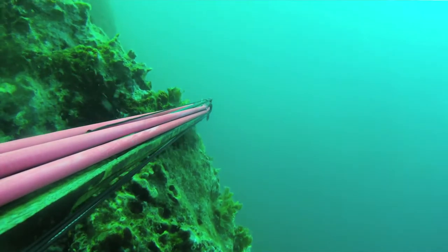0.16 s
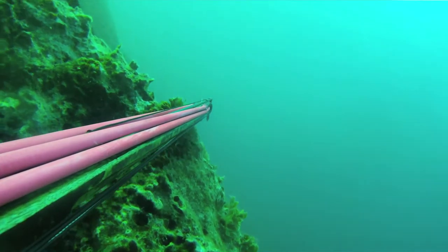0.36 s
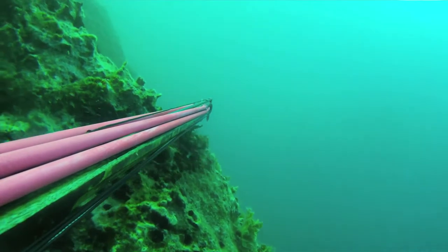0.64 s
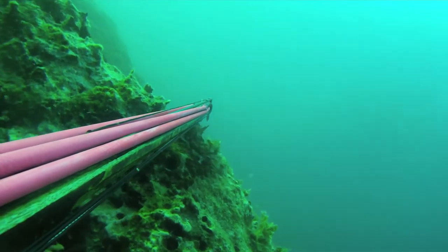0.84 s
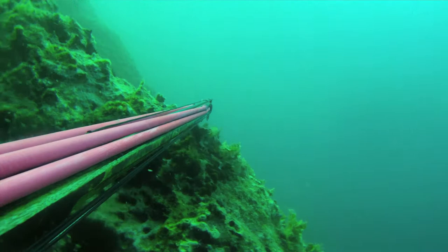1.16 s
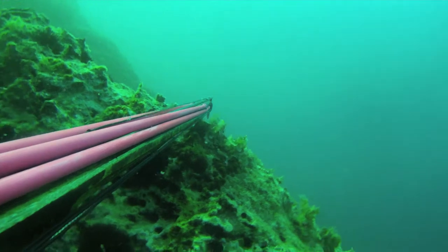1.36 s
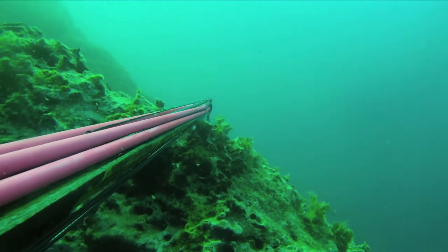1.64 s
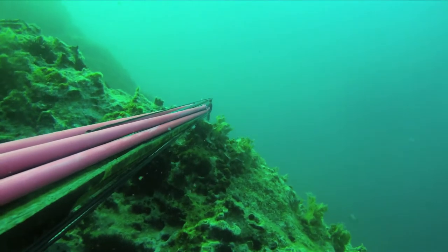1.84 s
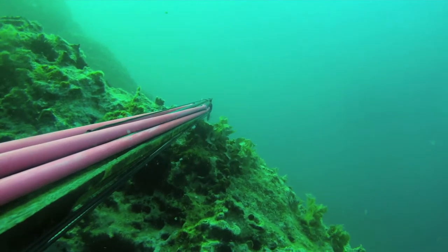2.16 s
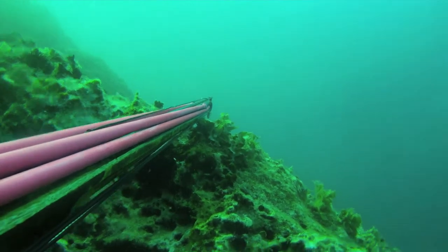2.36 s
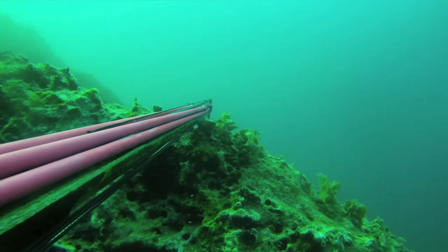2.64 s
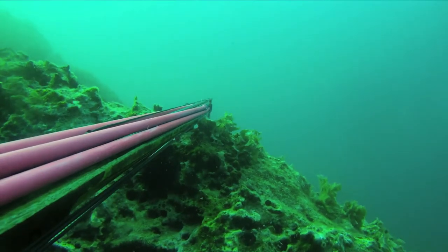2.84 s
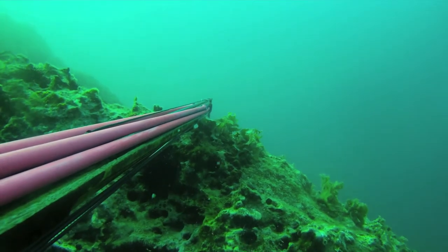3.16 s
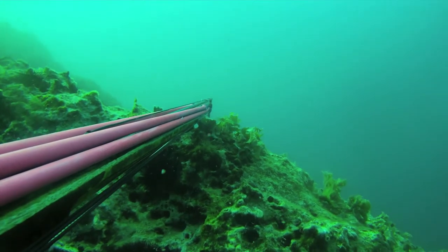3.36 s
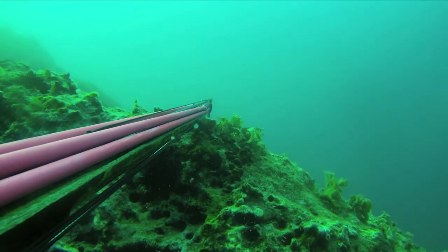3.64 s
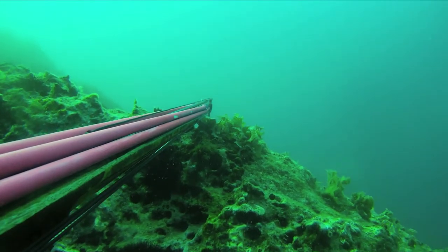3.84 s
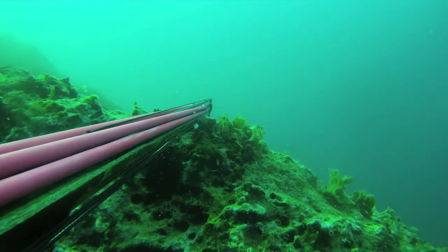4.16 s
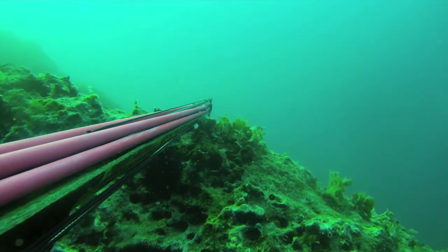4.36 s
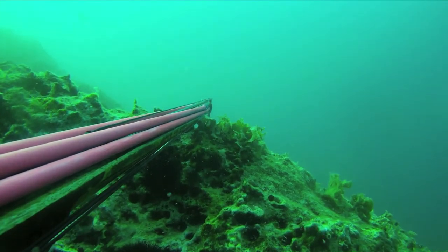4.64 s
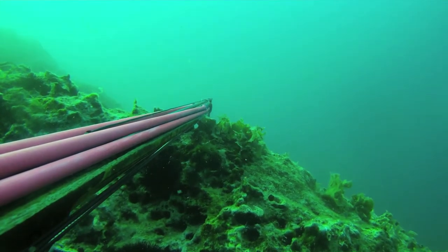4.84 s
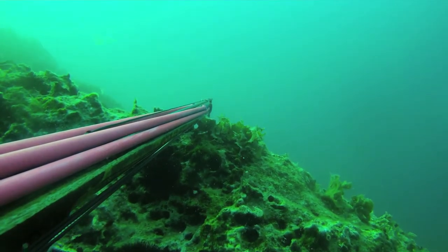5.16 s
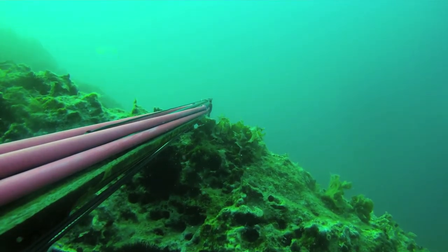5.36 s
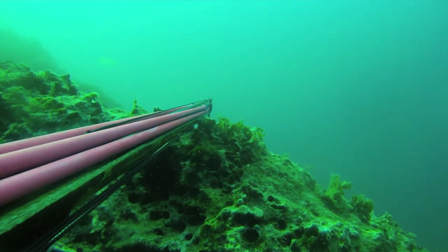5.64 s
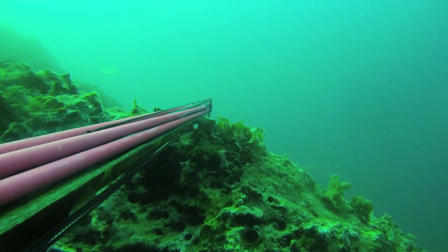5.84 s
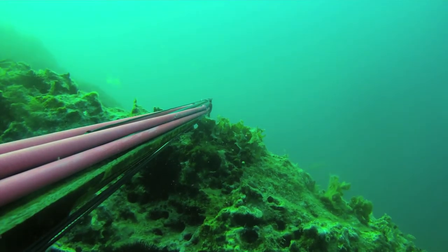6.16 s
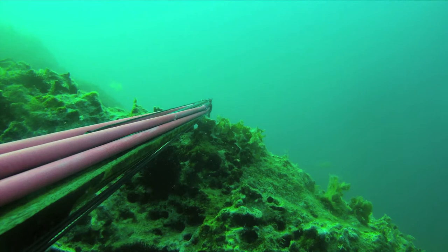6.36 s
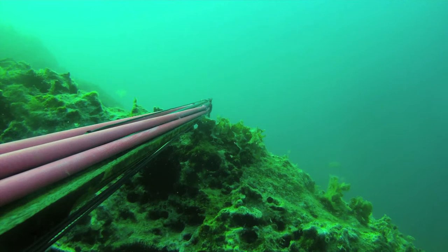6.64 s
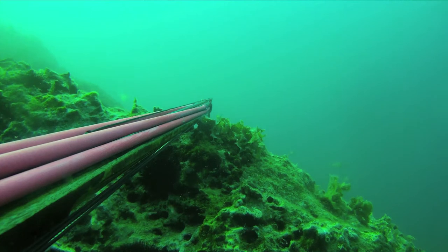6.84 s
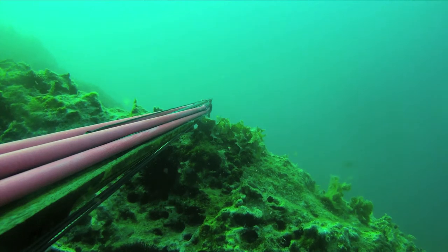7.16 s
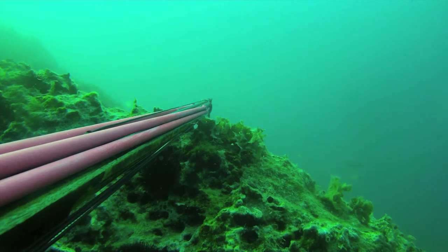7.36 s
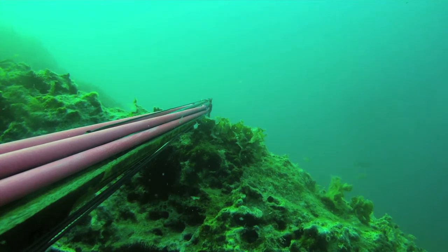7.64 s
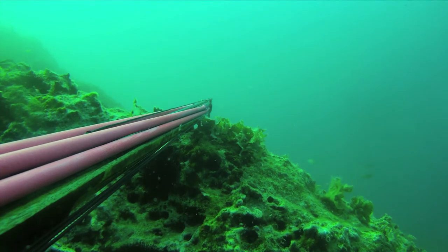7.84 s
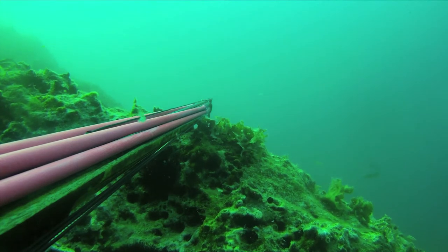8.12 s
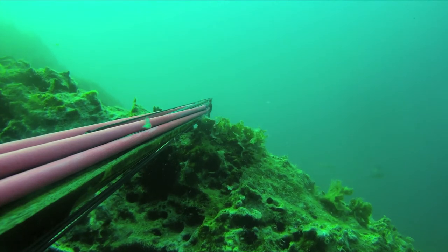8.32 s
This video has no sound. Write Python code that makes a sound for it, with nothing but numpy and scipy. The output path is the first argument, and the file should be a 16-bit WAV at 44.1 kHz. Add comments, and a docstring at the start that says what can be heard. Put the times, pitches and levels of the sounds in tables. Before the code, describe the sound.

Dense frying crackle of shrimp fills the water from start to end, near snaps standing out at irregular moments. Two dull knocks come within the first second, followed by a short burst of low gear thumps, rubbing and a tiny rubber squeak. After a calm stretch, three muffled knocks sound, then three more. Heard through a sealed underwater housing, with brittle, metallic highs.

```python
"""Shrimp crackle all round from the first moment, over a low wash: a rocky reef heard under water.
Each snap is one pulse with echoes off the rock, coloured by the sealed housing round the microphone.
Dull knocks rebound within milliseconds, first as a pair, then in two runs of three. Early on a diver's
speargun rumbles and rubs, bumps the housing and rings low, and rubber squeaks once.
The recorder holds each sample, which mirrors the sound into the treble."""
import sys
import numpy as np
from scipy import signal
from scipy.fft import rfft, irfft
from scipy.io import wavfile
from scipy.ndimage import uniform_filter1d

SR = 44100
rng = np.random.default_rng(int(sys.argv[2]) if len(sys.argv) > 2 else 0)


def generate_wav(signal):
    """Clip the signal to [-1, 1] and save it as 16-bit WAV at the path in sys.argv[1]."""
    frames = np.transpose(np.atleast_2d(signal))
    scaled = np.clip(frames, -1, 1) * 32767
    pcm = np.round(scaled).astype(np.int16)
    wavfile.write(sys.argv[1], SR, pcm)


N = 374409  # length in samples

HOLD_HZ, EDGE_HZ = 12000, 15450  # rate of the held samples, upper band limit
CREVICE_LOW_HZ, CREVICE_HIGH_HZ = 1750, 5150  # range in which the shrimps' crevices ring


def gain_of(db):
    """Decibels to amplitude."""
    return 10 ** (np.asarray(db) / 20)


def evened(x, size=None):
    """Scales x so that its first samples (or all) have an rms of 1."""
    return x / np.sqrt(np.mean(x[:size] ** 2) + 1e-20)


def read(points, hz):
    """Reads a spectrum on a log-frequency axis."""
    f, value = np.transpose(points)
    return np.interp(np.log(hz + 1), np.log(f + 1), value)


def add(mix, s, sound):
    """Mixes a sound in at time s."""
    part = mix[max(round(s * SR), 0):][:len(sound)]
    part += sound[:len(part)]


def ring(colour, tilt_db, from_hz, size=4096):
    """Minimum-phase impulse response of a spectrum, tilted in dB an octave from a corner to half the hold rate."""
    hz = abs(np.fft.fftfreq(size, 1 / SR))
    octaves = np.log2(np.clip(hz, from_hz, HOLD_HZ / 2))
    log_gain = np.log(gain_of(read(colour, hz) + tilt_db * octaves))
    # the Hilbert transform of the log gain gives the phase
    spectrum = np.exp(np.conj(signal.hilbert(log_gain)))
    return np.fft.ifft(spectrum).real[:size // 2]


def noise(colour):
    """Steady noise of a given spectrum, with an rms of 1."""
    gain = gain_of(read(colour, np.fft.rfftfreq(N, 1 / SR)))
    return evened(irfft(rfft(rng.standard_normal(N)) * gain, N))


def scatter(t60, per_s, size=6000):
    """A dying train of sparse random echoes with energy 1."""
    t = np.arange(size) / SR
    hits = rng.random(size) < per_s / SR
    taps = rng.standard_normal(size) * hits * gain_of(-60 * t / t60)
    return taps / (np.linalg.norm(taps) + 1e-12)


def disperse(x, hz, width_hz):
    """An all-pass resonance: the band round hz arrives late, as bending waves do in a thin wall."""
    r = np.exp(-np.pi * width_hz / SR)
    poles = np.array([1, -2 * r * np.cos(2 * np.pi * hz / SR), r * r])
    return signal.lfilter(poles[::-1], poles, x)


# The housing's answer to a snap. Each row: frequency in Hz, relative level in dB.
HOUSING_COLOUR = [(60, -42), (500, -23.5), (1100, -24.5), (1450, -13.5), (1600, -13), (1780, -2), (2150, 2),
                  (2550, 0), (2930, -9.5), (3150, -2), (3450, -9), (3850, -7.5), (4330, -13.5), (4700, -8),
                  (5350, -8.5), (5900, -17.5)]


def snap(tilt_db, crevice_hz, rock_t60, crevice_db=4, crevice_q=5, even_t60=0.028, reef_db=-11, reef_t60=0.093):
    """A collapsing bubble: one pulse, quick echoes off the rock round it, a thin tail from the reef."""
    # the deeper in a crevice, the more it is heard by its echoes
    echo_gain = np.sqrt(rock_t60 / even_t60)
    paths = echo_gain * scatter(rock_t60, per_s=9000)
    paths += gain_of(reef_db) * scatter(reef_t60, per_s=1500)
    paths[0] += 1  # the direct pulse
    crevice = signal.iirpeak(crevice_hz, crevice_q, fs=SR)
    paths += gain_of(crevice_db) * signal.lfilter(*crevice, paths)
    housing = ring(HOUSING_COLOUR, tilt_db, from_hz=1860)
    return evened(signal.fftconvolve(paths, housing), size=175)


def colony(per_s, spread_db, limit_db, tilt_db, tilt_spread_db, t60, count=32):
    """Many shrimp at random moments; each patch of reef has its own echoes and colour, and few snaps are strong."""
    out = np.zeros(N)
    leans = np.linspace(-1, 1, count)  # dull to bright patches
    crevices = rng.permutation(np.geomspace(CREVICE_LOW_HZ, CREVICE_HIGH_HZ, count))
    for lean, crevice_hz in zip(leans, crevices):
        size = gain_of(np.minimum(spread_db * rng.exponential(1, N), limit_db))
        fires = rng.random(N) < per_s / count / SR
        clicks = size * rng.choice([-1, 1], N) * fires
        # duller patches echo longer
        patch = snap(tilt_db + lean * tilt_spread_db, crevice_hz, t60 / 2 ** lean)
        out += signal.oaconvolve(clicks, patch)[:N]
    return evened(out)


def crackle(middle_db=-59, far_db=-57.5, swell_db=0.43, swell_hz=1.5, count=20):
    """Separate ticks from the middle distance over a duller fizz from afar that swells and thins at random."""
    middle = colony(per_s=180, spread_db=7, limit_db=21.5, tilt_db=9.5, tilt_spread_db=11, t60=0.0048)
    far = colony(per_s=600, spread_db=2.5, limit_db=8.0, tilt_db=0, tilt_spread_db=6.5, t60=0.041)
    t = np.arange(N) / SR
    rates = swell_hz * np.geomspace(.5, 2, count)
    swell = evened(sum(np.sin(2 * np.pi * (hz * t + rng.random())) for hz in rates))
    return gain_of(middle_db) * middle + gain_of(far_db + swell_db * swell) * far


# Low wash of the sea. Each row: frequency in Hz, relative level in dB per Hz.
WASH_COLOUR = [(8, -38), (30, -2.5), (65, -5.5), (110, -7), (240, -10.5), (520, -15.5), (1100, -19),
               (1600, -18.5), (3000, -22)]


def wash(level_db=-57.0):
    """The sea's low, steady wash: noise shaped by its spectrum."""
    return gain_of(level_db) * noise(WASH_COLOUR)


def neighbours(per_s=8, level_db=-46, spread_db=4.0, tilt_db=-1, tilt_spread_db=9, t60=0.023, t60_octaves=2.4):
    """Softer single snaps from the surrounding rock, at loose intervals, each with its own colour and echoes."""
    out = np.zeros(N)
    slots = np.arange(0, N / SR, 1 / per_s)
    draws = rng.uniform(-1, 1, (len(slots), 5))
    for slot, (late, strength, lean, depth, width) in zip(slots, draws):
        crevice_hz = np.interp(width, [-1, 1], [CREVICE_LOW_HZ, CREVICE_HIGH_HZ])
        sound = snap(tilt_db + lean * tilt_spread_db, crevice_hz, t60 * 2 ** (depth * t60_octaves))
        # each snap falls up to two intervals after its slot
        add(out, slot + (1 + late) / per_s, gain_of(level_db + strength * spread_db) * sound)
    return out


# The loudest shrimp, close by. Each row: start in seconds, level in dB, tilt in dB per octave,
# resonance of the crevice in Hz, t60 of the echoes off the rock in seconds.
NEAR_SNAPS = [(0.014, -38.5, -13, 4900, 0.061), (0.45, -36.5, 2, 4600, 0.015),
              (0.6505, -22.5, -2.5, 3900, 0.0092), (0.7209, -36.5, 3, 1640, 0.014),
              (1.505, -42, 4.5, 1800, 0.16), (1.7431, -37.5, -14, 4900, 0.03),
              (1.7862, -44.5, -14, 4800, 0.1), (2.076, -42.5, 2, 5000, 0.02), (2.256, -38, 2, 2980, 0.017),
              (2.2817, -41, -14, 3630, 0.052), (2.407, -38.5, 4.5, 4800, 0.0081),
              (2.5111, -42, -6.5, 5500, 0.021), (2.8448, -42.5, 0, 4960, 0.017),
              (3.017, -39, 12, 2000, 0.015), (3.1257, -40, 6, 3920, 0.009),
              (3.532, -36.5, -10.5, 5200, 0.014), (3.5426, -40, 4, 3020, 0.03),
              (3.6665, -34.5, -3, 2120, 0.044), (4.2996, -43, -8.5, 3320, 0.045),
              (4.4913, -44.5, -7, 4170, 0.14), (4.6744, -40.5, -4, 3800, 0.01),
              (4.6832, -40, -4, 3650, 0.0074), (5.0248, -42.5, 14, 5300, 0.014),
              (5.144, -42, 2, 3200, 0.021), (5.3684, -41, -6.5, 4800, 0.093),
              (5.417, -37.5, -2, 5500, 0.018), (5.5159, -44, 2, 2310, 0.05),
              (5.7916, -42.5, -11, 5000, 0.063), (5.8354, -40, -8, 3230, 0.008),
              (6.2995, -44, -4, 5530, 0.008), (6.3217, -43, -2, 2700, 0.024),
              (6.751, -40, -12.5, 1710, 0.019), (6.7895, -43, -8, 4500, 0.071),
              (7.0224, -38.5, 9, 2210, 0.021), (7.215, -33, -11, 2470, 0.014),
              (7.2269, -40.5, 7, 1900, 0.013), (7.567, -45.5, 2, 1700, 0.067),
              (7.7045, -40.5, 5, 3520, 0.009), (7.7384, -34, -7, 2400, 0.079),
              (8.3929, -40.5, 1, 5540, 0.009), (8.4396, -40, -7, 5000, 0.019)]


def near_shrimp():
    """Single sharp snaps from the rock close by, each ringing its own crevice."""
    out = np.zeros(N)
    for s, db, tilt_db, crevice_hz, t60 in NEAR_SNAPS:
        add(out, s, gain_of(db) * snap(tilt_db, crevice_hz, t60))
    return out


# Dull knocks. Each row: start in seconds, level in dB, tilt in dB per octave,
# rebound as a share of the first push, rebound delay in seconds.
KNOCK_EVENTS = [(0.691, -23.5, 2.5, 0.47, 0.009), (.923, -42, -1, 0.38, 0.01),
                (4.2957, -22, 2.6, 0.5, 0.0083), (4.5284, -27, 1, 0.29, 0.0089),
                (4.77, -28.5, -3.5, .1, 0.006), (6.6338, -22, 2, 0.78, 0.0088),
                (6.88, -23.5, -.5, 0.46, 0.0096), (7.127, -24.5, -0.5, 0.38, 0.0096)]
# Colour of a knock. Each row: frequency in Hz, relative level in dB.
KNOCK_SPECTRUM = [(15, -50), (36, -7), (55, -10.5), (82, 1.5), (112, 7), (150, 2), (220, -13), (285, -3.5),
                  (330, -9), (395, -21), (490, -15), (620, -31.5), (760, -36.5), (1300, -81)]


def knocks(boom_db=-19, boom_hz=96, boom_t60=0.25):
    """Soft blows that rebound twice, the second time far weaker, and leave a faint boom."""
    out, t = np.zeros(N), np.arange(9000) / SR
    boom = gain_of(boom_db - 60 * t / boom_t60) * np.sin(2 * np.pi * boom_hz * t)
    for s, db, tilt_db, rebound, delay in KNOCK_EVENTS:
        push = ring(KNOCK_SPECTRUM, tilt_db, from_hz=80)
        blow = np.zeros(len(t))
        for k in range(3):
            add(blow, k * delay, rebound ** (k * k) * push)
        add(out, s, -gain_of(db) * (evened(blow, size=900) + boom))
    return disperse(out, hz=385, width_hz=190)


# The gun shifting in the hand. Each row: start in seconds, length in seconds,
# rumble level in dB, rubbing level in dB.
GUN_SHIFTS = [(0.937, 0.018, -48.5, -79), (1.333, 0.065, -39, -51), (1.764, 0.14, -47, -62),
              (2.34, 0.042, -52, -51), (3.043, 0.033, -60.5, -58.5)]
# Colour of the rumble. Each row: frequency in Hz, relative level in dB per Hz.
RUMBLE_COLOUR = [(8, -50), (30, -1.5), (65, 11), (130, -8), (220, -15), (500, -16), (1200, -58)]
# Colour of the rubbing, before its grain. Each row: frequency in Hz, relative level in dB per Hz.
RUB_COLOUR = [(80, -31), (300, -8), (620, -9.5), (740, -9), (820, 4), (920, -10), (1200, -13.5), (2000, -9),
              (4000, -44)]


def handling(rise_db_per_s=167, fall_db_per_s=105, rub_haste=1.9, grain_db=3.0):
    """Low rumble and grainy rubbing that build up, hold and settle each time the gun is moved."""
    t, rumble, rub = np.arange(N) / SR, np.zeros(N), np.zeros(N)
    for s, length, rumble_db, rub_db in GUN_SHIFTS:
        before, after = np.maximum(s - t, 0), np.maximum(t - s - length, 0)
        fade_db = rise_db_per_s * before + fall_db_per_s * after
        rumble += gain_of(rumble_db - fade_db)
        rub += gain_of(rub_db - rub_haste * fade_db)  # rubbing comes and goes faster than the rumble
    grain = gain_of(grain_db * evened(uniform_filter1d(rng.standard_normal(N), size=300)))
    return rumble * noise(RUMBLE_COLOUR) + rub * evened(grain * noise(RUB_COLOUR))


# Gear bumping against the housing. Each row: start in seconds, level in dB, tilt in dB per octave.
BUMP_EVENTS = [(1.232, -36, 2), (1.2413, -18, -0.7), (1.249, -21.5, 3), (1.2531, -35, 4.5),
               (1.269, -24.5, -1), (1.2765, -32, 3), (1.2801, -18.5, 0.05), (1.289, -24.5, -3.5),
               (1.3332, -31.5, -2), (1.34, -28, 1.5), (1.362, -28.5, -2.5), (1.387, -31.5, -3),
               (1.435, -38, 1.3), (1.457, -38, -3), (1.6361, -31, 2), (1.643, -30, -3.5), (1.682, -44, 2),
               (1.689, -37, -4), (1.759, -45, -2.5), (1.7805, -39.5, 0.5), (1.968, -51, 2.5),
               (2.187, -47.5, 5), (2.281, -40, -6), (2.3515, -36.5, 4.5), (2.357, -33.5, -1.5)]
# Colour of a bump. Each row: frequency in Hz, relative level in dB.
BUMP_SPECTRUM = [(12, -52), (30, -24), (50, -23), (70, 7.5), (120, 6.5), (250, -1), (430, -7.5), (580, -8),
                 (680, -10), (880, -11), (1200, -19), (2050, -17), (2750, -38), (3300, -28.5), (4300, -52)]
# Slow ringing of the gun after a bump. Each row: frequency in Hz, level against the bump in dB, t60 in seconds.
GUN_RINGING = [(66.5, -3, 0.24), (119.5, -11.5, 0.16), (225, -29, .1)]


def bumps(chatter_db=-3, chatter_t60=0.042):
    """Each contact chatters for a moment and leaves the gun ringing low."""
    out, t = np.zeros(N), np.arange(SR // 3) / SR
    gun = sum(gain_of(db - 60 * t / t60) * np.sin(2 * np.pi * hz * t) for hz, db, t60 in GUN_RINGING)
    for s, db, tilt_db in BUMP_EVENTS:
        contact = gain_of(chatter_db) * scatter(chatter_t60, per_s=2500)
        contact[0] += 1  # the first touch
        colour = ring(BUMP_SPECTRUM, tilt_db, from_hz=150)
        blow = evened(signal.fftconvolve(contact, colour), size=265)
        add(out, s, -gain_of(db) * blow)
        add(out, s, -gain_of(db) * gun)
    return disperse(out, hz=810, width_hz=310)


# Path of the rubber squeak. Each row: time in seconds, pitch before the waver in Hz, level in dB.
SQUEAK_PATH = [(1.84, 778, -54), (1.857, 615, -48), (1.863, 773, -33.5), (1.87, 940, -37),
               (1.876, 1007, -35), (1.879, 850, -44), (1.883, 807, -33.5), (1.890, 830, -44),
               (1.908, 800, -65)]


def squeak(jitter=0.076, second_db=-11, third_db=-19):
    """Rubber sticks and slips: three harmonics on a wavering pitch that dips, arches up and falls back."""
    s, hz, db = np.transpose(SQUEAK_PATH)
    t = np.arange(s[0], s[-1], 1 / SR)
    waver = 1 + jitter * evened(uniform_filter1d(rng.standard_normal(N), size=60))[:len(t)]
    phase = 2 * np.pi * np.cumsum(np.interp(t, s, hz) * waver) / SR
    harmonics = enumerate([0, second_db, third_db], start=1)
    tone = sum(gain_of(part_db) * np.sin(k * phase) for k, part_db in harmonics)
    out = np.zeros(N)
    add(out, s[0], gain_of(np.interp(t, s, db)) * evened(tone))
    return out


def scene():
    """Reef, sea and gear, all through one microphone."""
    reef = crackle() + wash() + neighbours() + near_shrimp()
    gear = handling() + bumps() + squeak()
    return (reef + knocks() + gear)[None]


def record(dry):
    """Samples slowly and holds each value, which mirrors the spectrum round the hold rate; then the band limit."""
    slow = signal.resample_poly(dry, HOLD_HZ, SR, axis=1, window=("kaiser", 3))
    steps = np.repeat(slow, 4, axis=1)
    held = signal.resample_poly(steps, SR, 4 * HOLD_HZ, axis=1)
    band_limit = signal.firwin(201, EDGE_HZ, window=("kaiser", 9), fs=SR)
    return signal.oaconvolve(held, band_limit[None], "same")


dry = scene()
out = record(dry)
generate_wav(out)
```